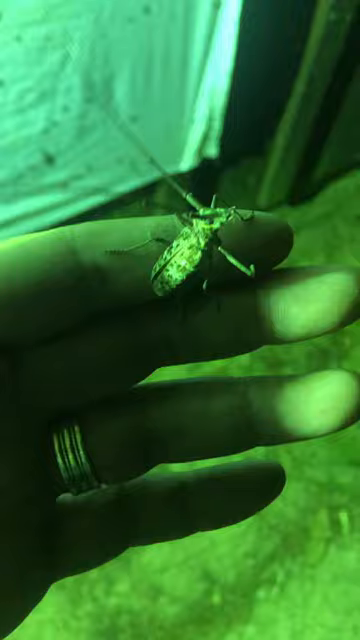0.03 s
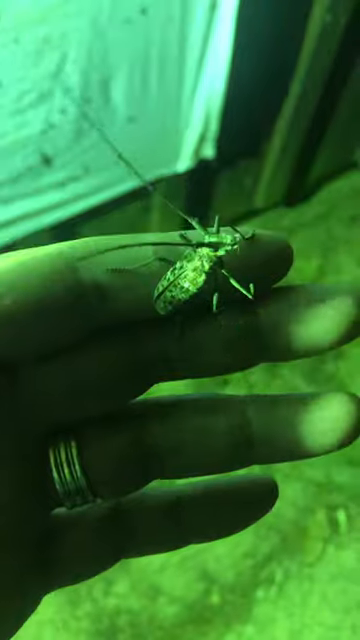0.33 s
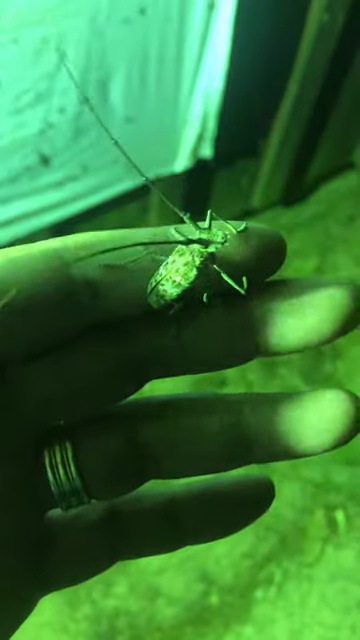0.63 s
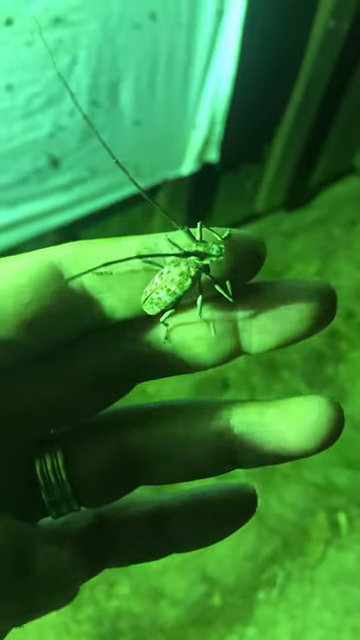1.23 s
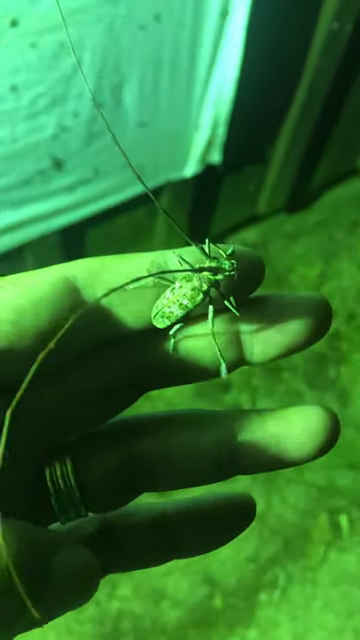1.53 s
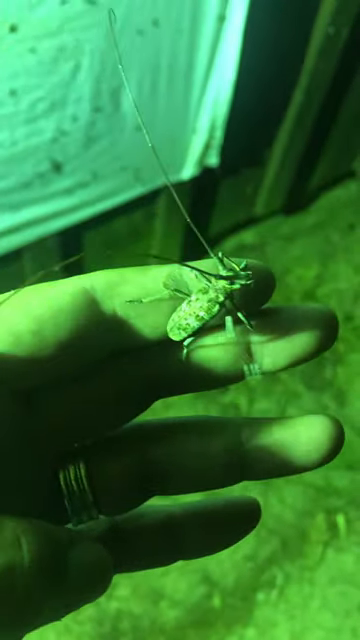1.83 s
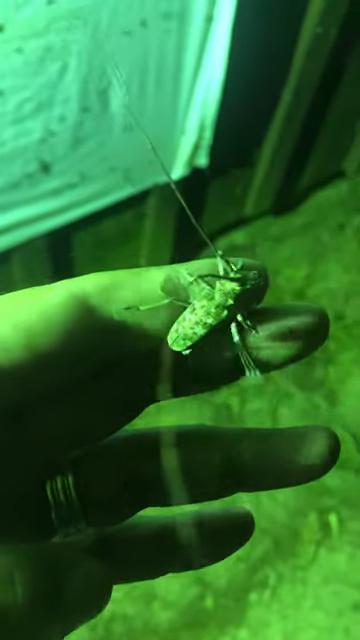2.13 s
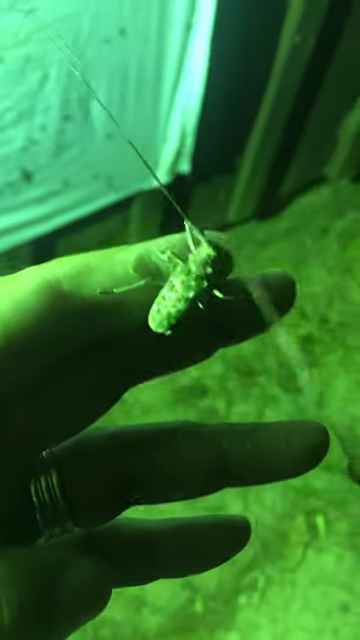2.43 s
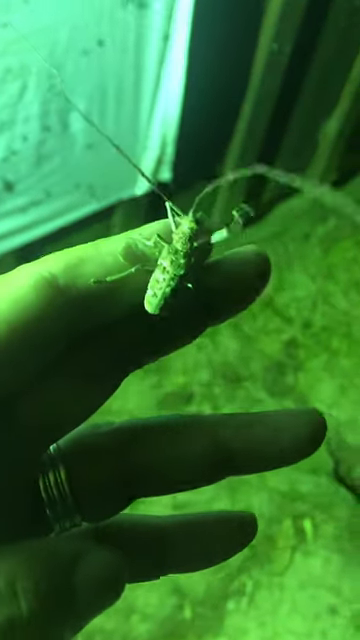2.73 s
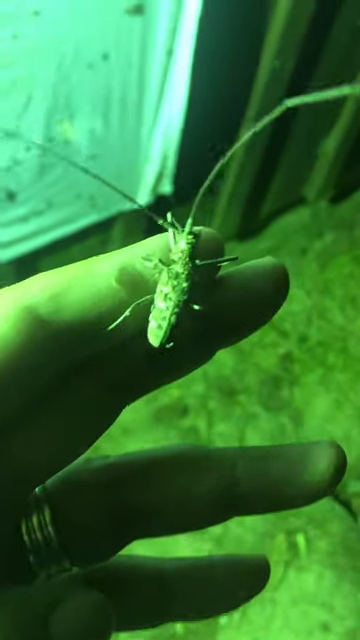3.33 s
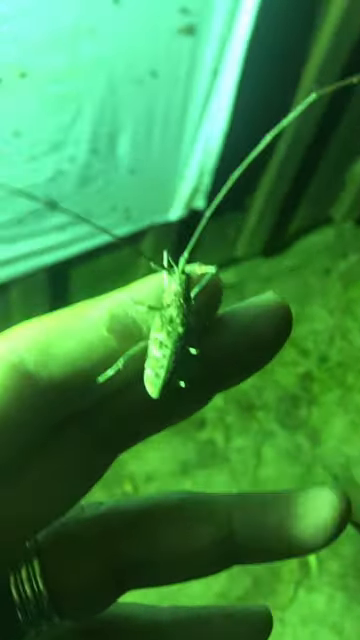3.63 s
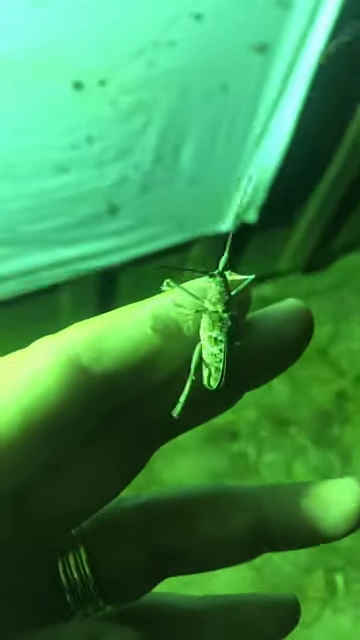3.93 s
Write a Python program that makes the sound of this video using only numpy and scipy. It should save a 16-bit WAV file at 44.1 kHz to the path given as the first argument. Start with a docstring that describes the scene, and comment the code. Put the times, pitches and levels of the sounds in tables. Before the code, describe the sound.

Night insects trill without pause outside a house, a few nearer ones above a distant chorus. A motor hums low underneath, while a hand close to the microphone makes faint ticks and two soft brushes.

```python
"""Night insects, first and without pause: outside a house, a few pulsed wing trills stand out of a far
chorus. A motor, probably an air conditioner, hums over rumble and night air; its deep tone slowly grows.
Short, lower rasps come and go. Close to the moving microphone, a hand carrying a beetle makes a few
faint ticks and brushes something twice."""
import sys
import numpy as np
from scipy import signal
from scipy.fft import rfft, irfft, next_fast_len
from scipy.io import wavfile
from scipy.ndimage import map_coordinates

SR = 44100
rng = np.random.default_rng(int(sys.argv[2]) if len(sys.argv) > 2 else 0)


def file_out(sig):
    """Save sig as 16-bit WAV at sys.argv[1]."""
    # one column per channel
    cols = np.atleast_2d(sig).T
    # limit, then scale
    lim = np.clip(cols, -1, 1)
    pcm = np.round(lim * 32767).astype(np.int16)
    wavfile.write(sys.argv[1], SR, pcm)


N = 176400


def amp(db):
    """Decibels to gain."""
    return 10 ** (np.asarray(db) / 20)


def unit(x):
    """Scale to rms 1."""
    return x / np.sqrt(np.mean(x ** 2) + 1e-20)


def seconds():
    """The time of each sample."""
    return np.arange(N) / SR


def fader(rows):
    """A gain that follows straight lines between (t/s, level/dB) points."""
    return amp(np.interp(seconds(), *np.transpose(rows)))


def wobble(rate):
    """A smooth random curve, rate knots a second."""
    return map_coordinates(rng.standard_normal(4096), [seconds() * rate + 2], mode="mirror")


def filtered(x, response):
    """Shape the spectrum of x by a gain that depends on frequency."""
    size = next_fast_len(N + SR // 2)
    return irfft(rfft(x, size) * response(np.fft.rfftfreq(size, 1 / SR)), size)[:N]


def noise(spectrum):
    """Noise of rms 1, coloured by (f/Hz, relative level/dB) points."""
    f, db = np.transpose(spectrum)
    colour = lambda hz: amp(np.interp(np.log(hz + 1), np.log(f), db, -120, -120))
    return unit(filtered(rng.standard_normal(N), colour))


def cycles(hz):
    """Cycles run through at a changing frequency, from a random start."""
    return np.cumsum(hz) / SR + rng.random()


def trill(hz, scatter_hz, wing_hz, db, return_gain, stroke_share=0.47, drift_hz=23.96):
    """Each wing cycle scrapes a short, rough tone and a weaker one on the return."""
    swing = lambda wing: np.sin(np.pi * np.minimum(wing % 1 / stroke_share, 1))
    wing = cycles(wing_hz * (1 + 0.0086 * wobble(2.99)))
    strokes = swing(wing) + return_gain * swing(wing + .5)
    phase = 2 * np.pi * cycles(hz + drift_hz * wobble(3) + scatter_hz * wobble(450))
    tone = np.sin(phase) + amp(-22.5) * np.sin(2 * phase)
    unevenness_db = 1.14 * wobble(80) + 0.1 * wobble(4)  # stroke to stroke, and a slow swell
    return amp(db) * unit(strokes * tone * amp(unevenness_db))


# Insects around the house (carrier f/Hz, tooth scatter/Hz, wing rate/Hz, base level/dB, return gain)
NEAR_INSECTS = [(5558, 50, 54, -73, 0.44), (5550, 75, 55.3, -80, .3), (5310, 86, 53.6, -76.5, .4)]
# One thin, steady cricket (same columns)
HIGH_CRICKET = (7390, 52, 50.5, -83, 0.5)
# How strongly the nearer insects reach the moving microphone (t/s, relative level/dB)
INSECT_PICKUP = [(0, -0.5), (.6, -0.5), (.95, .5), (1.25, -1.5), (1.55, 0), (1.75, -6.5), (2.15, 2),
                 (2.5, 0), (3.3, 1), (3.7, -3.5), (3.95, 4.5)]

def trills(echo_db=-4.5, echo_t60_s=0.23):
    """The nearer trills arrive direct and scattered by walls and plants; the high cricket is dry."""
    direct = sum(trill(*insect) for insect in NEAR_INSECTS)
    t = np.arange(SR // 2) / SR
    tail = rng.standard_normal(len(t)) * amp(-60 * t / echo_t60_s)
    echo = signal.fftconvolve(direct, tail / np.linalg.norm(tail))[:N]
    return fader(INSECT_PICKUP) * (direct + amp(echo_db) * echo) + trill(*HIGH_CRICKET)


# Spectra of the distant insects, upper and lower band (f/Hz, relative level/dB)
FAR_HIGH_BAND = [(4900, -31), (5200, -10.5), (5400, 6), (5620, 7), (5800, 3), (6000, -1.5), (6250, -12.5),
                 (6600, -78)]
FAR_LOW_BAND = [(2600, -38), (3200, -10), (3550, -5), (3780, -1), (3980, -0.5), (4280, -7.5), (4550, -10.5),
                (5000, -23.5)]

def far_chorus(high_db=-69, low_db=-72.5):
    """Far from the microphone, many insects merge into two fluttering bands."""
    high = unit(noise(FAR_HIGH_BAND) * amp(-2 * wobble(120) + 0.97 * wobble(6.94)))
    low = unit(noise(FAR_LOW_BAND) * amp(1.12 * wobble(130) + 1.1 * wobble(14)))
    return amp(high_db) * high + amp(low_db) * low


# The motor's deep, second and middle tones and thin whine at the microphone (t/s, level/dB)
DEEP_TONE = [(0, -47.5), (.65, -63.5), (.85, -50.5), (1.2, -51.5), (1.55, -47.5), (2.3, -46), (2.9, -43.5),
             (4, -43.5)]
SECOND_TONE = [(0, -63), (.7, -64), (1.1, -60.5), (1.7, -63.5), (2.1, -66.5), (2.8, -57.5), (3.05, -56.5),
               (3.3, -68), (4, -67)]
MID_TONE = [(0, -76), (.5, -70), (1, -71.5), (1.35, -64.5), (1.7, -76), (2.5, -77), (3, -73), (4, -78.5)]
THIN_WHINE = [(0, -85), (.55, -73.5), (.8, -76.5), (1, -74), (1.3, -85), (1.7, -68.5), (1.95, -78),
              (2.4, -77), (2.7, -72.5), (2.95, -89), (3.25, -74), (3.45, -79), (3.7, -70.5), (4, -83)]
# A bed of hum under it; the 480 Hz line is mains hum, not the motor (f/Hz, level/dB)
HUM_LINES = [(85.5, -61), (171.5, -68.5), (285, -80.5), (480, -71.5), (513, -74.5), (598, -77.5),
             (683, -78.5), (769, -80.5), (1026, -89), (1281, -91.5), (1304, -92)]

def motor(shaft_hz=28.42, waver_hz=1.598, waver_db=2.5):
    """A turning shaft sounds four of its harmonics over wavering lines of hum."""
    shaft = 2 * np.pi * cycles(shaft_hz * (1 + 0.0025 * wobble(12)))
    harmonics = [(5, DEEP_TONE), (8, SECOND_TONE), (13, MID_TONE), (33, THIN_WHINE)]
    out = sum(fader(level) * unit(np.sin(order * shaft)) for order, level in harmonics)
    for hz, db in HUM_LINES:
        line = np.sin(2 * np.pi * cycles(hz + waver_hz * wobble(12)))
        out += amp(db) * unit(line * amp(waver_db * wobble(5)))
    return out


# Spectra of the open air and of a soft upper-middle rush (f/Hz, relative level/dB)
AIR_SPECTRUM = [(60, -23), (200, -8.5), (320, 1.5), (500, -4.5), (900, -6.5), (1400, -15.5), (2000, -22),
                (2800, -23.5), (4800, -22.5), (6800, -26.5), (8500, -30.5), (10000, -30.5), (11100, -28.5),
                (12700, -34.5), (16000, -30.5)]
RUSH_SPECTRUM = [(700, -9.5), (1200, -0.5), (1700, -2), (2100, -4), (2700, -9), (3500, -12)]
# The rush at the microphone (t/s, level/dB)
RUSH_FADER = [(0, -73.5), (.5, -75.5), (1.2, -74.5), (1.7, -77.5), (2.05, -73.5), (2.3, -71), (2.6, -77),
              (3, -81), (3.4, -78), (4, -75)]

def night_air(air_db=-62.5, throb_hz=3 * 28.42, throb_depth=0.078):
    """The air around the house throbs with the motor, three times to a turn of the shaft."""
    throb = 1 + throb_depth * np.sin(2 * np.pi * throb_hz * seconds())
    air = amp(air_db + 0.87 * wobble(8.1)) * noise(AIR_SPECTRUM)
    rush = fader(RUSH_FADER) * noise(RUSH_SPECTRUM)
    return throb * (air + rush)


# Spectra of the place's low rumble and upper-bass boom (f/Hz, relative level/dB)
RUMBLE_SPECTRUM = [(20, -43), (35, -38.5), (52, -12.5), (66, -20.5), (80, -9.5), (88, 4), (100, -11),
                   (125, -10.5), (160, -13), (205, -12), (250, -14.5), (300, -33), (500, -32.5)]
BOOM_SPECTRUM = [(100, -16), (135, -22), (150, -2.5), (175, -8.5), (205, -17.5), (240, -19), (290, -12.5)]
# Each at the microphone (t/s, level/dB)
RUMBLE_FADER = [(0, -55.5), (.45, -55.5), (.62, -60), (1, -57.5), (1.6, -56), (2.0, -55), (2.3, -52),
                (2.6, -55.5), (3.3, -54.5), (3.6, -57.5), (4, -53.5)]
BOOM_FADER = [(0, -61.5), (.5, -53), (.63, -59), (1, -55), (2, -67.5), (4, -58)]

def rumble():
    """Low noise lies under everything; a boom swells early, fades and creeps back."""
    return fader(RUMBLE_FADER) * noise(RUMBLE_SPECTRUM) + fader(BOOM_FADER) * noise(BOOM_SPECTRUM)


# Lower, raspy chirps among the insects (peak t/s, f/Hz, peak level/dB)
RASPS = [(.122, 4150, -70), (.148, 3880, -67), (.235, 3970, -71), (.76, 3940, -69), (.96, 4120, -71),
         (2.2, 3890, -73), (3.48, 3780, -70)]

def chirps(half_width_s=.013, scatter_hz=100):
    """Short tones, rough with pitch jitter, rise out of the far chorus's lower band."""
    out = np.zeros(N)
    for peak_s, hz, db in RASPS:
        rasp = np.sin(2 * np.pi * cycles(hz + scatter_hz * wobble(600)))
        swell = np.exp(-((seconds() - peak_s) / half_width_s) ** 2)
        out += amp(db) * swell * unit(rasp)
    return out


# The hand's ticks, close up (t/s, relative level/dB, centre f/Hz, half-width/octaves, 60 dB decay/s)
HAND_CONTACTS = [(0.645, -59, 3200, .25, 0.017), (.644, -74, 14500, .3, .02), (1.369, -77, 15000, .2, .03),
                 (1.682, -71, 14000, .5, 0.027), (1.815, -74, 13500, .5, 0.067),
                 (2.411, -70, 7500, .4, .02), (2.607, -72, 14500, .4, .05), (2.654, -73, 13000, .3, .01),
                 (2.886, -61.5, 7500, .45, 0.019), (2.886, -71, 14000, .4, .05)]

def hand_ticks(attack_s=0.0011):
    """Tiny dry contacts, each a quickly dying puff of noise in one band."""
    out = np.zeros(N)
    for start_s, db, centre_hz, octaves, t60_s in HAND_CONTACTS:
        t = np.maximum(seconds() - start_s, 0)
        band = lambda hz: 1 / (1 + (np.log2((hz + 1) / centre_hz) / octaves) ** 2)
        puff = unit(filtered(rng.standard_normal(N), band))
        attack = 1 - np.exp(-t / attack_s)
        out += 2 * amp(db - 60 * t / t60_s) * attack * puff
    return out


# Skin brushing near the microphone; the first two rows merge (peak t/s, rise/s, fall/s, peak level/dB)
SKIN_STROKES = [(.798, 0.043, .025, -65), (.828, 0.026, 0.0094, -63.5), (.914, 0.022, .028, -67.5)]
# Spectrum of the rubbing skin (f/Hz, relative level/dB)
SKIN_SPECTRUM = [(2500, -19), (6000, 1), (9000, -3.5), (12000, 3), (13500, 0), (15000, 2), (16000, 3)]

def hand_brushes(grain_db=1.3):
    """Sliding skin makes soft, grainy hisses that swell and stop."""
    out = np.zeros(N)
    for peak_s, rise_s, fall_s, db in SKIN_STROKES:
        t = seconds() - peak_s
        swell = np.exp(-np.abs(t / np.where(t < 0, rise_s, fall_s)) ** 0.76)
        hiss = unit(noise(SKIN_SPECTRUM) * amp(grain_db * wobble(400)))
        out += amp(db) * swell * hiss
    return out


def scene():
    """The night around the house and the hand close by, at one microphone."""
    surroundings = trills() + far_chorus() + motor() + night_air() + rumble() + chirps()
    return (surroundings + hand_ticks() + hand_brushes())[None]


def record(dry, open_s=.036, fade_s=.003, top_hz=15800):
    """The microphone opens after a moment of silence and passes nothing above top_hz."""
    fade = np.clip((seconds() - open_s) / fade_s + .5, 0, 1)
    return filtered(dry[0] * fade, lambda hz: hz < top_hz)[None]


dry = scene()
out = record(dry)
file_out(out)
```